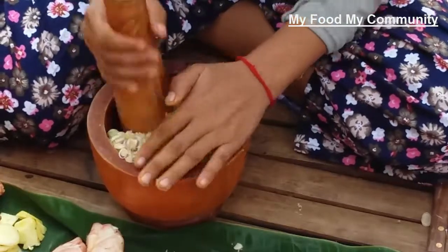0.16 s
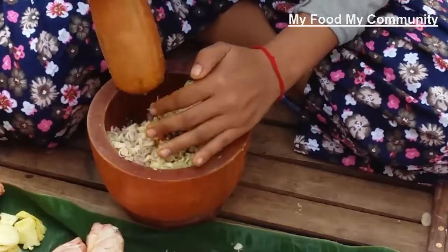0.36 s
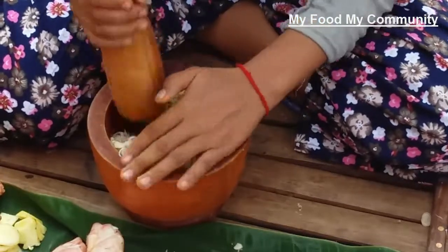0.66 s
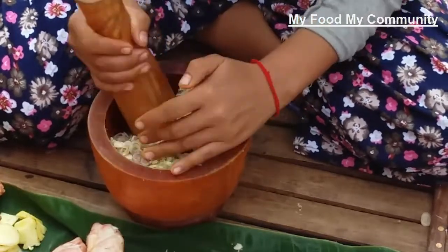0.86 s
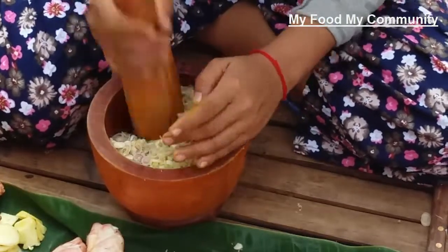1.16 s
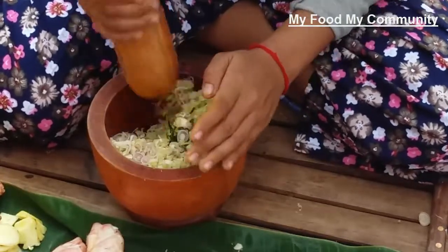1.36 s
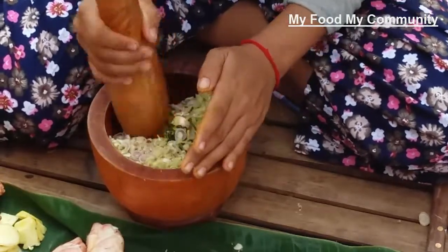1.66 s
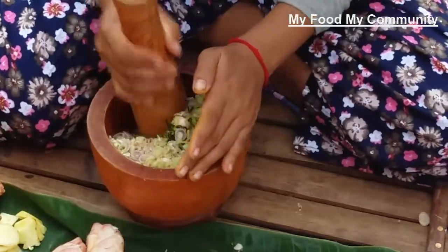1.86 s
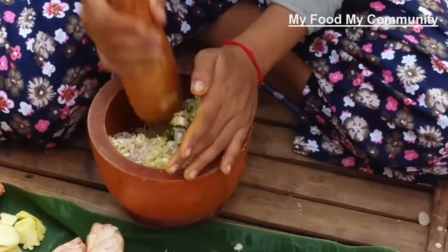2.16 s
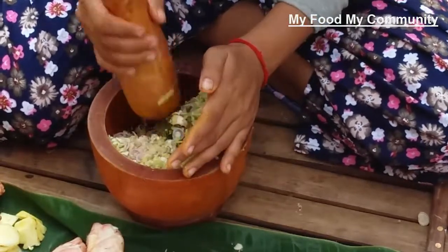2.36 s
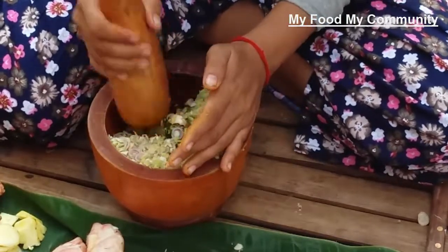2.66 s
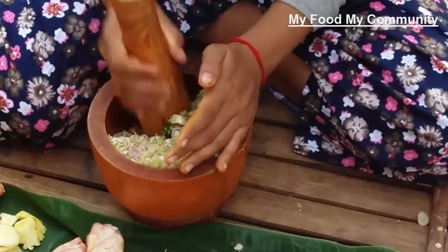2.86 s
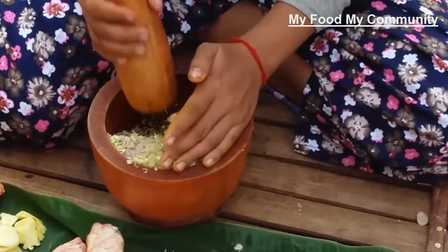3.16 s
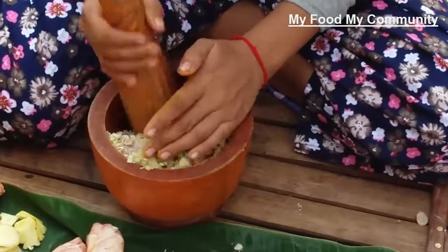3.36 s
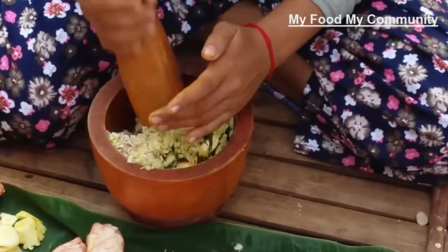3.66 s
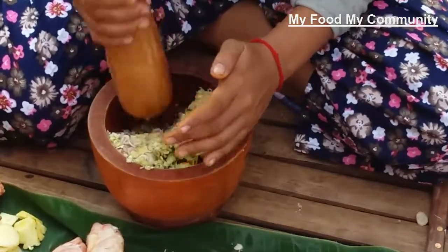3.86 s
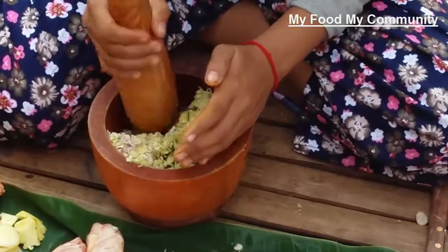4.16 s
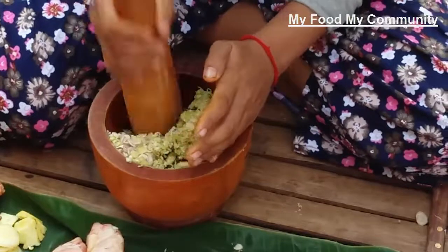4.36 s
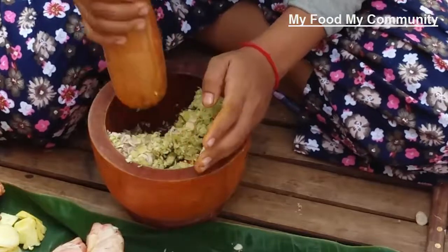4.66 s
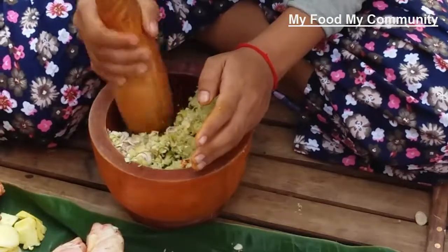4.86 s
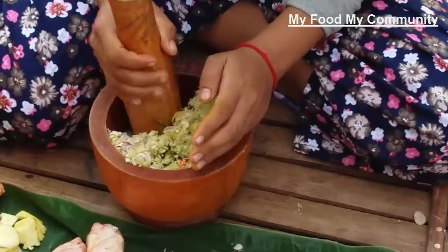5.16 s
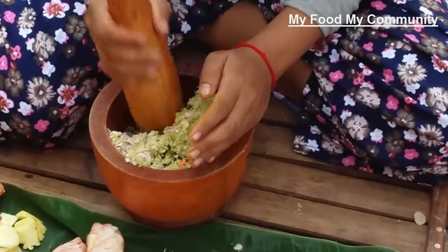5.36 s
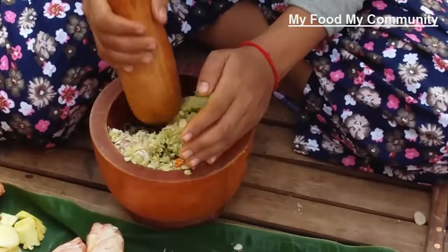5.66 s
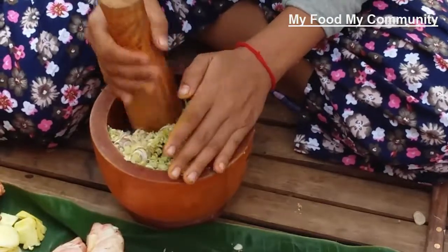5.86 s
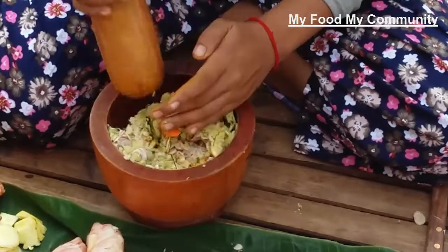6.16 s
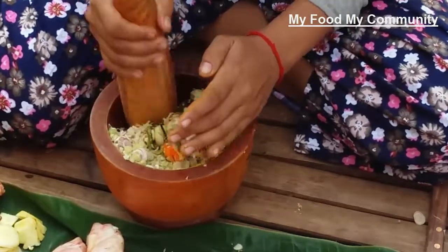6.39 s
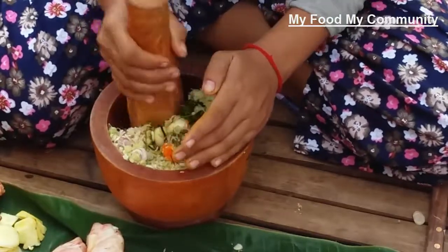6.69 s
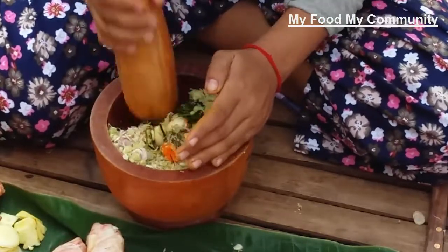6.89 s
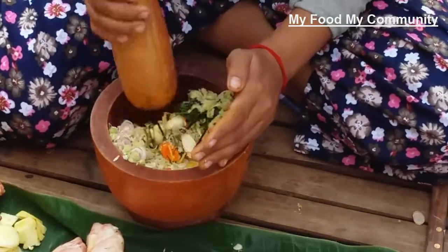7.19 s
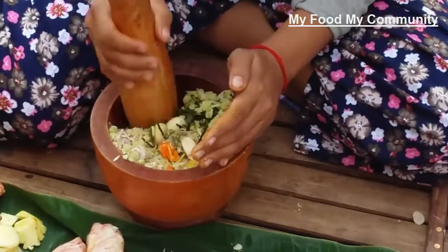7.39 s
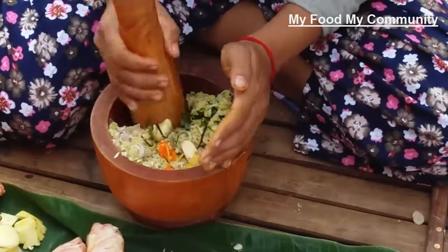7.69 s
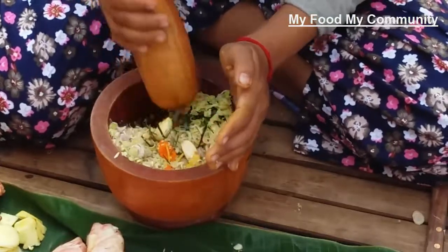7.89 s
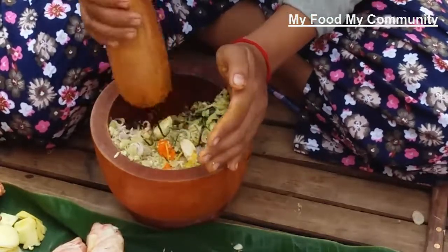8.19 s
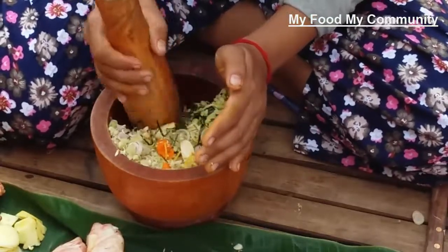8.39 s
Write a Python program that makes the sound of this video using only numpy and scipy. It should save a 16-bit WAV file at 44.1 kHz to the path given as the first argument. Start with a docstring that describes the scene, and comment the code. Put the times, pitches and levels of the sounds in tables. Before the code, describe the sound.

Close, mono sound of a wooden pestle pounding herbs in a clay mortar on a slatted platform under an open shelter. A firm knock with a slight double contact lands at 0.14 s, a weak one at 0.6, and a barely audible herb rustle at 0.9. From about 0.95 s strokes come every third of a second, each a short hollow clay knock, low wooden thud and moist crackling crunch, dying fast with a short dull tail. Loose things rattle lightly after many strokes, notably at 2.3, 4.2 and 4.5 s. A soft tap falls at 3.8; blows from 4.5 to 5.5 s are harder and brighter, with little rattle by 5.5. After a strong hit at 5.84 there is a gap, a very faint touch at 6.4, then steady medium strokes resume; a weaker pair at 8.07 and 8.19 precedes a clackier knock at 8.4. Quiet outdoor air and faint swelling hiss continue beneath.

```python
"""A wooden pestle pounds chopped herbs in a clay mortar on a slatted wooden platform, in an open-sided kitchen.
Random clicks filtered into a crackle make the crushed stalks; dying sine waves make the bowl, pestle and slats ring.
Random taps jingle loose things after the strokes, and noise echoes give the shelter a short tail.
A hand sweeps herbs once, and filtered noise makes the quiet outdoors and a faint hiss that swells and fades."""
import sys
import numpy as np
from scipy import signal
from scipy.fft import rfft, irfft, next_fast_len
from scipy.io import wavfile

SR = 44100
rng = np.random.default_rng(int(sys.argv[2]) if len(sys.argv) > 2 else 0)


def store_pcm(level_fs):
    """Save levels as 16-bit WAV."""
    pcm = np.round(np.clip(level_fs, -1, 1) * 32767).astype(np.int16)
    wavfile.write(sys.argv[1], SR, np.atleast_2d(pcm).T)


N = 376173   # samples in the whole scene
T = np.arange(int(.4 * SR)) / SR   # seconds since one contact began
# time to sink through a thin film of paste, and through a deep heap of herbs
FILM_S, HEAP_S = 0.00083, 0.00485


# Full strokes of the pestle; all but the jingle level are starting values for contact().
# Columns: t/s of the knock, knock level/dB, hardness/dB, clack level/dB, thud level/dB, jingle level/dB
STROKES = [(0.1433, -19, 0, -25, -30.5, -18.5), (0.6167, -35, -2, -37, -40, -45),
           (.952, -29, -2.5, -52, -36.5, -24), (1.3149, -26, -4.5, -34, -24.5, -23),
           (1.6656, -21.5, -4, -57, -31.5, -24), (2.0015, -34.5, -3.5, -57, -29, -24.5),
           (2.3198, -18.5, -4, -39, -25, -18.5), (2.6504, -34.5, -3, -48.5, -28.5, -31),
           (2.9941, -18, 2, -26.5, -28.5, -20), (3.348, -18.5, -2, -34, -28.5, -30.5),
           (3.825, -37, -2, -46, -34, -50), (4.1697, -22, -7, -48, -30.5, -18),
           (4.5114, -24, 6, -31, -25, -17), (4.8611, -21, -0.5, -39.5, -29.5, -26.5),
           (5.1945, -20.5, 4.5, -38, -23, -35), (5.5162, -21.5, 5.5, -31, -28, -43),
           (5.842, -17.5, -2, -51.5, -33, -51), (6.4004, -43.5, -4, -64.5, -37, -54),
           (6.7293, -26, -5, -43.5, -29.5, -30), (7.07, -21.5, -1.5, -45, -27, -23.5),
           (7.407, -28.5, -4, -51.5, -26, -21.5), (7.7338, -23.5, -1.5, -42, -34.5, -46),
           (8.0695, -30, -9.5, -58, -43, -59), (8.192, -34, -8, -37, -45.5, -57),
           (8.4036, -22, -4, -22.5, -32, -46)]
# Lighter contacts: slips just after a stroke, and faint touches between or just before strokes; they crush less.
# Columns: t/s, knock level/dB before contact() adds its gain, hardness/dB
LIGHT_TOUCHES = [(.151, -28.5, 5.5), (.16, -24.5, -0.5), (0.314, -54.5, -3), (0.6429, -33.5, -2),
                 (0.932, -51.5, 1), (.972, -37, -4.5), (1.079, -53, -6), (2.0114, -38.5, -5),
                 (2.667, -38, 2.5), (3.5185, -49, -2), (3.839, -36.5, -4), (4.8664, -25.5, -2),
                 (4.958, -46, -7.5), (5.2005, -24.5, -6), (5.848, -31, -5.5), (6.0433, -55.5, 5.5),
                 (7.174, -50.5, -3), (8.097, -41, -2)]


def pounding():
    """Strokes and light touches, each answered by the shelter; every stroke has its own amount of jingle."""
    direct, reflected = np.zeros((2, N))
    contacts = []
    for s, knock_db, hardness_db, clack_db, thud_db, jingle_db in STROKES:
        sink_s = sinking(thud_db - knock_db - hardness_db)
        sound = contact(knock_db, hardness_db, clack_db, thud_db, sink_s)
        # start early, so that the knock itself falls on time s
        contacts.append((s - sink_s + FILM_S, sound))
        add(direct, s, from_db(jingle_db) * jingle())
    for s, knock_db, hardness_db in LIGHT_TOUCHES:
        # a light touch shakes the slats and rings the pestle in step with its knock
        clack_db = knock_db + hardness_db - 11
        thud_db = -12.5 + .7 * knock_db
        sound = contact(knock_db, hardness_db, clack_db, thud_db, FILM_S, extra_crush_db=-2)
        contacts.append((s, sound))
    for s, sound in contacts:
        add(direct, s, sound)
        add(reflected, s, echoes(sound))
    return direct + coloured(reflected, SHELTER)


def sinking(excess_db, heap_from_db=0.7, heap_range_db=5):
    """Seconds the pestle sinks through the herbs: the more the thud outweighs the hard knock, the deeper the heap."""
    depth = np.clip((excess_db - heap_from_db) / heap_range_db, 0, 1)
    return FILM_S + (HEAP_S - FILM_S) * depth


def contact(knock_db, hardness_db, clack_db, thud_db, sink_s, extra_crush_db=0,
            knock_gain_db=5.5, clack_gain_db=-1.0, thud_gain_db=29.0):
    """The herbs give way and the platform takes the load; in a heap this comes just before the pestle bottoms out."""
    lead_s = max(sink_s - FILM_S, 0)   # a mere film of paste passes the blow on at once
    # the crush grows with knock, thud and hardness
    crush_db = 21.5 + extra_crush_db + 0.41 * knock_db + 0.55 * thud_db + 0.17 * hardness_db
    # a heap of herbs crushes up to 1 dB louder than a film of paste
    crush_db += 1 * lead_s / (HEAP_S - FILM_S)
    sound = from_db(thud_db + thud_gain_db) * thud(sink_s)
    sound += from_db(crush_db) * crush(sink_s)
    add(sound, lead_s, from_db(knock_db + knock_gain_db) * knock(hardness_db))
    add(sound, lead_s, from_db(clack_db + clack_gain_db) * clack())
    return sound


# The notes at which the clay mortar rings, before small random changes and the tilt for hardness.
# Columns: f/Hz, level/dB, time to fade by 60 dB/s
MORTAR = [(945, 0.5, 0.087), (1023, -4.5, 0.059), (1106, -5, 0.034), (1390, -1.5, 0.02), (1539, -1, 0.02),
          (1681, -1, 0.023), (1926, -9, 0.042), (2020, -16, 0.06), (2320, -23.5, 0.0152),
          (4280, -42.5, 0.067), (4830, -29.5, 0.059), (5800, -27.5, .02), (6710, -29, 0.026),
          (8700, -40, 0.072)]


def knock(hardness_db, soft_hz=1000, hard_hz=1500, radiate_hz=480, grind=0.74, grind_t60=0.036):
    """The pestle reaches the clay and grinds briefly; the less herb lies between, the stronger the upper notes."""
    mode_hz = np.array(MORTAR)[:, 0]
    # 0 below soft_hz, rising to 1 at hard_hz and above
    upper = np.clip(np.log(mode_hz / soft_hz) / np.log(hard_hz / soft_hz), 0, 1)
    ring = ringing(MORTAR, spread_db=1, detune=.012, tilt_db=hardness_db * upper)
    grit = grains(per_s=2000, spread_db=2)
    force = grind * unit_energy(grit * dying(T, grind_t60))
    force[0] = 1   # the blow itself
    # grinding spreads the blow's energy in time without adding to it
    bowl = np.linalg.norm(ring) * unit_energy(driven(force, ring))
    # the moist paste rounds the start of the contact over 0.7 ms
    bowl = bowl * np.sin(np.pi / 2 * np.minimum(T / .0007, 1)) ** 2
    # a small bowl radiates little bass
    return high_pass(bowl * hold_then_drop(), 2, radiate_hz)


def hold_then_drop(hold_s=.016, drop_t60=0.042):
    """The bowl's ring holds briefly, then drops away quickly, as if an early reflection cancelled it."""
    return dying(np.maximum(T - hold_s, 0), drop_t60)


# How sound spreads over pitch when herb stalks snap.
# Columns: f/Hz, relative level/dB
CRUSH = [(300, 10), (1000, 22.5), (2500, 14.5), (3800, -4.5), (6000, -3), (8000, -8), (10000, -6),
         (12000, -13), (14000, -8), (16000, -18)]


def crush(sink_s, snap_t60=0.12, stretch=9.4, crack=0.3, crack_t60=0.019):
    """A first crack, then stalk fibres snap in a dense burst, for longer where the herbs lie deep."""
    first_crack = crack * dying(T, crack_t60)
    effort = first_crack + dying(T, snap_t60 + stretch * sink_s)
    snaps = grains(per_s=9000, spread_db=4) * effort
    return unit_energy(coloured(snaps, CRUSH))


# The notes at which the wooden pestle rings, before small random changes.
# Columns: f/Hz, level/dB, time to fade by 60 dB/s
PESTLE = [(2680, -4, .016), (2850, 0, .022), (3230, -13, .012)]


def clack():
    """The pestle itself rings for an instant."""
    return ringing(PESTLE, spread_db=1, detune=.01)


# The notes of the slatted platform under the mortar, before random changes.
# Columns: f/Hz, level/dB, time to fade by 60 dB/s
PLATFORM = [(78, -28, 0.1342), (144, -14.5, 0.15), (224, -9, 0.042), (269, -2.5, 0.048), (338, -2, 0.043),
            (437.7, -2.5, 0.054), (496, -3.5, 0.049), (553, 0, 0.013), (662, -1.5, 0.022),
            (780, -4.5, 0.039)]


def thud(sink_s, push_t60=1 / 900, shudder=2.6, shudder_t60=0.1, radiate_hz=125):
    """The push passes through the mortar into the slats, which shudder; a deep cushion of herbs dulls it."""
    force = shudder * unit_energy(grains(per_s=1500, spread_db=2.5) * dying(T, shudder_t60))
    force[0] = 1   # the first push
    force = driven(force, dying(T, sink_s) + dying(T, push_t60))
    slats = driven(force, ringing(PLATFORM, spread_db=1.0, detune=0.055))
    return unit_energy(high_pass(slats, 3, radiate_hz))


# The notes of the loose things that jingle, before slight random detuning.
# Columns: f/Hz, level/dB, time to fade by 60 dB/s
JINGLE = [(2390, 6, .018), (3000, -3, .006), (4230, -1, .022), (4420, -2, .012), (4600, -1, .02),
          (4800, -4, .01), (6200, -9, .004), (7470, -14, .025), (7820, -15, .025)]


def jingle(lift_s=0.0063, rise_s=.04, settle_t60=0.22):
    """Loose things hop on the shaken slats, chatter for a moment and settle."""
    rise = np.clip((T - lift_s) / rise_s, 0, 1)
    settle = dying(np.maximum(T - lift_s - rise_s, 0), settle_t60)
    taps = grains(per_s=900, spread_db=4) * rise * settle
    return unit_energy(driven(taps, ringing(JINGLE, spread_db=0.0, detune=0.0047)))


# Tone of the shelter's echoes, which pounding() applies to all of them together.
# Columns: f/Hz, level/dB
SHELTER = [(60, -6.5), (150, -7), (300, 0), (480, 3), (780, -2.5), (950, -9.5), (1200, -3.5), (1600, -8.5),
           (2400, -4), (4000, -1), (8000, -8.5), (16000, -8)]


def echoes(sound, first_s=0.0081, build_s=0.0032, near_t60=0.25, far_t60=0.59,
           near_db=-6.5, far_db=-16.0, air_hz=3000):
    """Floor and roof answer, then a faint dull tail; each contact gets its own random pattern of dense echoes."""
    onset = np.clip((T - first_s) / build_s, 0, 1)
    near = unit_energy(rng.standard_normal(len(T)) * onset * dying(T, near_t60))
    far = unit_energy(rng.standard_normal(len(T)) * onset * dying(T, far_t60))
    far = signal.sosfilt(signal.butter(2, air_hz, fs=SR, output="sos"), far)   # dulls the tail
    return driven(sound, from_db(near_db) * near + from_db(far_db) * far)


# Tone of the herbs being swept together.
# Columns: f/Hz, relative level/dB
RUSTLE = [(500, -11), (1100, 10), (1800, 1), (2700, 2), (3700, -15), (9000, -33)]


def rustle():
    """The free hand sweeps herbs back into the bowl: one brief, faint swell of noise."""
    return swell(s=0.886, half_s=0.059, db=-59.5) * noise(RUSTLE)


# Tone of the steady outdoor air.
# Columns: f/Hz, relative level/dB
OUTDOORS = [(15, -26.5), (25, -25.5), (44, -7), (81, 2.5), (112, 3), (318, -11), (501, -10.5), (729, -14),
            (952, -15), (1180, -16), (2370, -23), (3930, -34), (5570, -37.5), (6720, -36), (15000, -38.5)]
# Tone of the faint hiss.
# Columns: f/Hz, relative level/dB
HISS = [(400, 14), (1500, 5), (3000, 3.5), (4800, -8.5), (6500, 2.5), (7400, -2.5), (8500, -12.5),
        (12000, -17.5), (16000, -41.5)]
# When the hiss swells; each swell adds to its resting level.
# Columns: t/s at the top, half length/s, level/dB at the top
SWELLS = [(1.89, 0.23, -65), (2.72, .15, -68), (3.85, 0.076, -68), (4.55, .3, -74.5), (5.46, 0.15, -63),
          (5.7, .2, -67), (6.819, 0.088, -66.5), (7.425, 0.07, -62), (8.054, .15, -75)]


def background(outdoors_db=-60, hiss_rest_db=-80.5):
    """Steady outdoor air and a faint hiss that swells now and then, both made of filtered noise."""
    hiss_gain = from_db(hiss_rest_db) + sum(swell(*row) for row in SWELLS)
    return from_db(outdoors_db) * noise(OUTDOORS) + hiss_gain * noise(HISS)


def swell(s, half_s, db):
    """Gain that rises smoothly to db at time s and fades again."""
    return from_db(db) * np.exp(-((np.arange(N) / SR - s) / half_s) ** 2)


def noise(spectrum):
    """Steady noise with the given tone and an average (rms) strength of 1."""
    return unit_energy(coloured(rng.standard_normal(N), spectrum)) * np.sqrt(N)


def ringing(modes, spread_db, detune, tilt_db=0):
    """A tapped body's notes; the place of the tap changes each note's strength, tuning and start a little."""
    hz, db, t60 = np.transpose(modes)
    gain = from_db(db + tilt_db + spread_db * rng.standard_normal(len(hz)))
    hz = hz * (1 + detune * rng.standard_normal(len(hz)))
    delay_s = rng.uniform(0, .00045, (len(hz), 1))
    t = np.maximum(T - delay_s, 0)
    return gain @ (np.sin(2 * np.pi * hz[:, None] * t) * dying(t, t60[:, None]))


def grains(per_s, spread_db):
    """Clicks of uneven size at random moments, pushing either way."""
    sizes = from_db(spread_db * np.clip(rng.standard_normal(len(T)), -2, 2))
    sizes = sizes * rng.choice([-1, 1], len(T))
    return sizes * (rng.random(len(T)) < per_s / SR)


def driven(force, answer):
    """A body's sound when a force keeps acting: each bit of force starts its own copy of the answer."""
    return signal.fftconvolve(force, answer)[:len(force)]


def coloured(x, spectrum):
    """Filter to the given tone without any sound before its cause (minimum phase)."""
    size = next_fast_len(2 * len(x))
    size += size % 2
    hz, db = np.transpose(spectrum)
    grid = np.maximum(np.fft.rfftfreq(size, 1 / SR), 1)
    gain = from_db(np.interp(np.log(grid), np.log(hz), db))
    # folding the cepstrum (the transform of the log gain) forward in time makes the filter causal
    cepstrum = irfft(np.log(gain))
    cepstrum[1:size // 2] *= 2
    cepstrum[size // 2 + 1:] = 0
    return irfft(rfft(x, size) * np.exp(rfft(cepstrum)))[:len(x)]


def high_pass(x, order, cut_hz):
    """Weaken what lies below cut_hz."""
    return signal.sosfilt(signal.butter(order, cut_hz, "high", fs=SR, output="sos"), x)


def from_db(db):
    """Turn decibels into a plain factor."""
    return 10 ** (np.asarray(db) / 20)


def unit_energy(x):
    """Scale a sound so that its squared samples add up to 1."""
    return x / np.sqrt(np.sum(x ** 2) + 1e-20)


def dying(t, t60):
    """Fade that falls by 60 dB every t60 seconds."""
    return from_db(-60 * t / t60)


def add(out, s, sound):
    """Mix a sound in from time s on."""
    start = max(round(s * SR), 0)
    out[start:start + len(sound)] += sound[:len(out) - start]


def scene():
    """The mortar under the shelter, the hand's rustle and the background, in one channel."""
    return (pounding() + rustle() + background())[None]


def record(dry, low_cut_hz=50, top_cut_hz=15900):
    """The microphone sheds the deep bass; the top is cut steeply."""
    thinned = high_pass(dry, 2, low_cut_hz)
    return signal.sosfilt(signal.ellip(10, .1, 80, top_cut_hz, fs=SR, output="sos"), thinned)


dry = scene()
out = record(dry)
store_pcm(out)
```